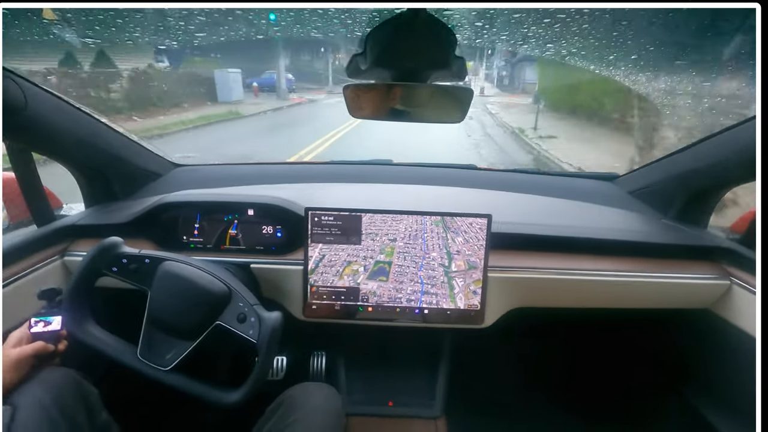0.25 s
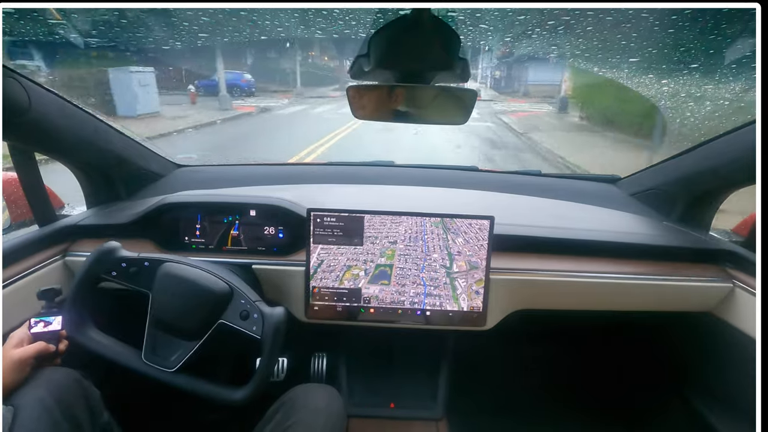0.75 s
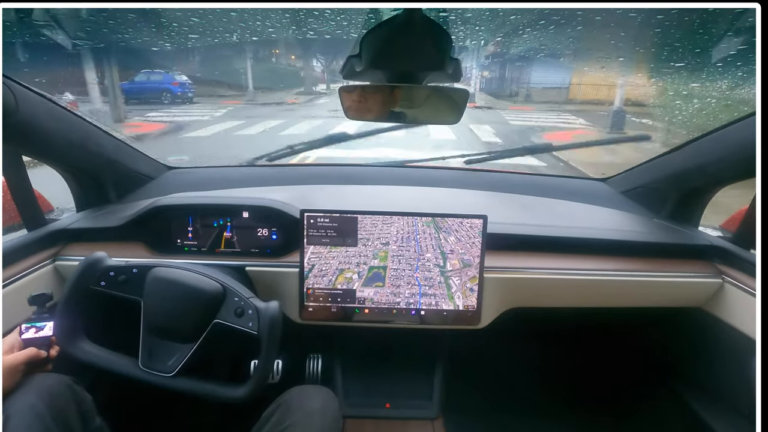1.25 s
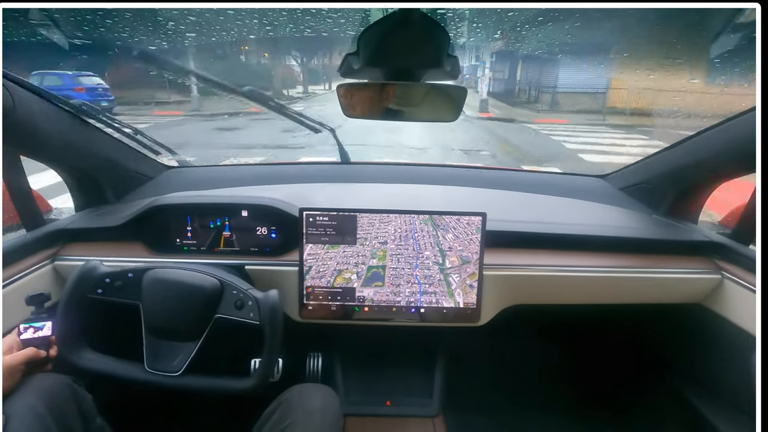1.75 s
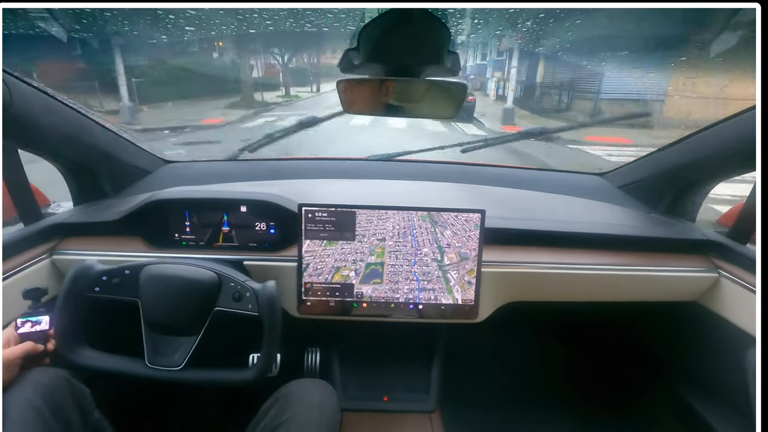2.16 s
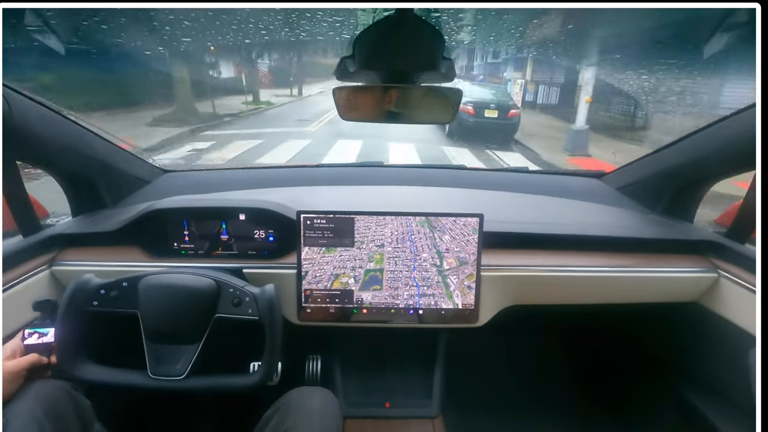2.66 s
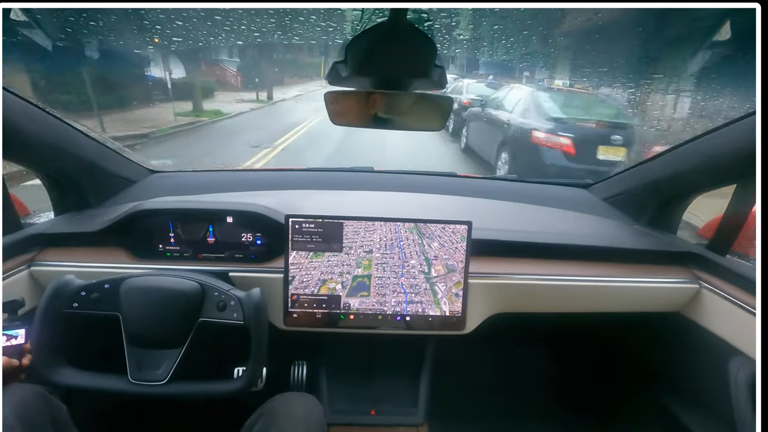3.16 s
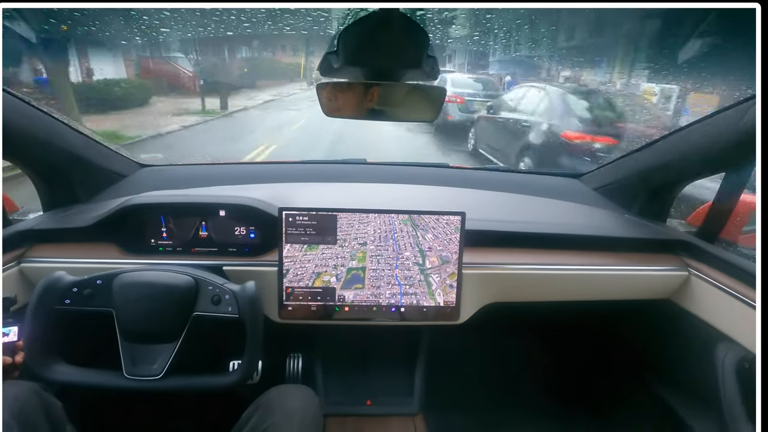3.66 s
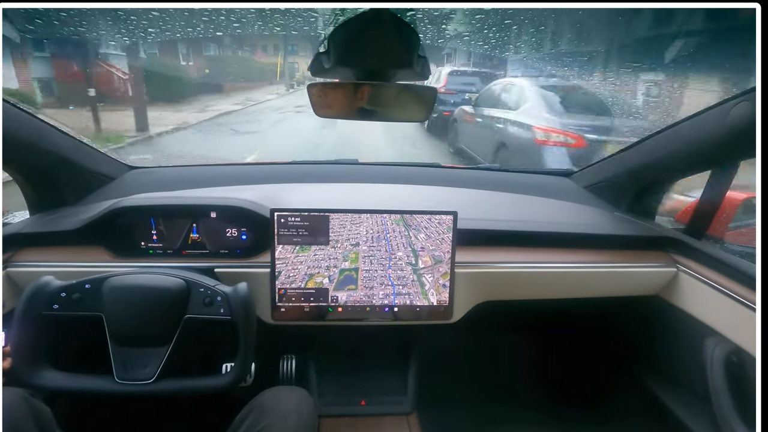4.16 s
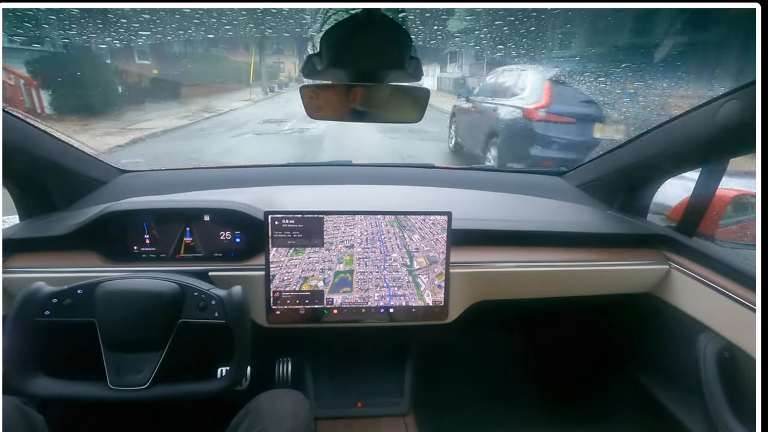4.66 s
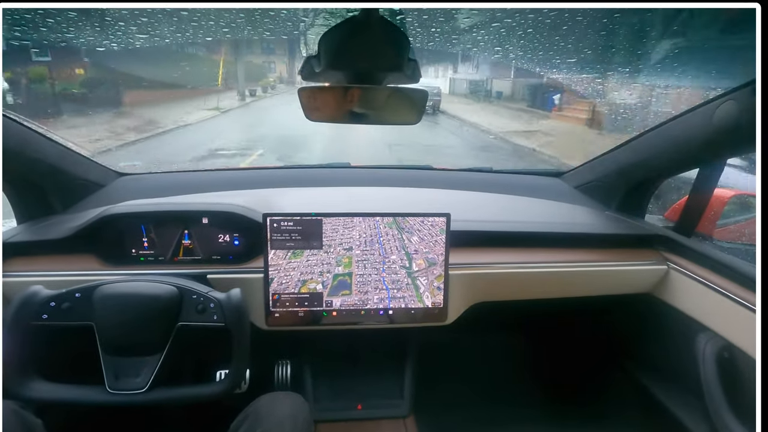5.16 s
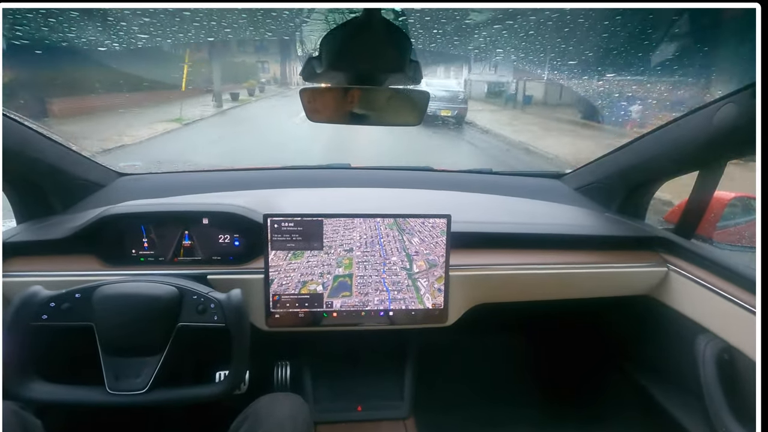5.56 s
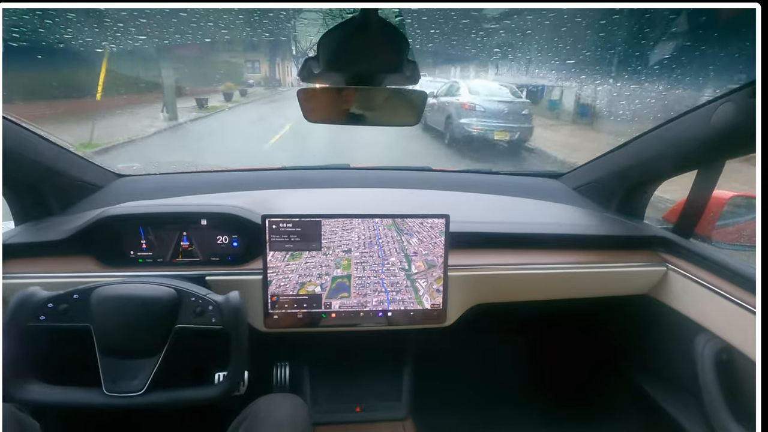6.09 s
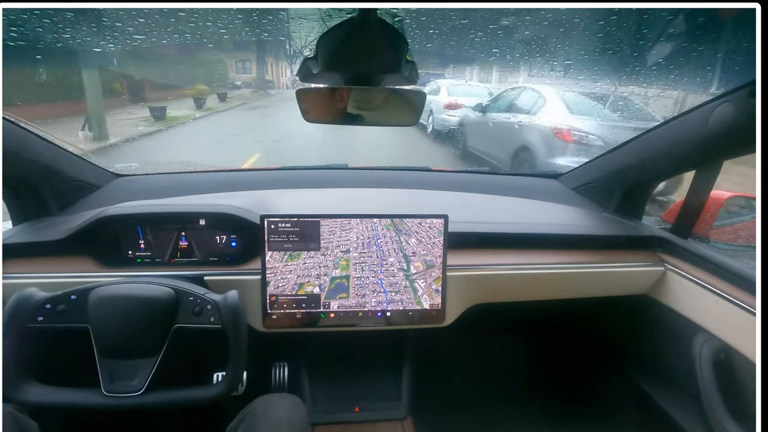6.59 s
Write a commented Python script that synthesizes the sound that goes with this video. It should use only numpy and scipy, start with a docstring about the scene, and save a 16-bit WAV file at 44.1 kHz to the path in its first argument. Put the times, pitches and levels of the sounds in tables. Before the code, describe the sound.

Heard from inside a car cabin driving through rain: low body rumble, tyre drone and soft wet hiss continue throughout. Fine drops patter densely while larger ones tick sharply on the glass. Bumps thump right at the start and in a heavier cluster around two and a half seconds, with trim knocking and a little splashing. Later bumps are softer, and the road noise dulls as the car slows.

```python
"""Wet street from inside a car

Shaped noise makes the rumble of the body, the tyre drone and roar, and the hiss and splashes of water.
Short bursts of noise make drops tick on glass and roof, and dying sine waves ring the glass as well.
Dying sine waves also make the thumps over bumps, dull knocks (most in the trim) and a small bright chink.
Rough sine tones squeak briefly; faint, wavering ones are the motor as the car speeds up and slows."""
import sys
import numpy as np
from scipy import signal
from scipy.fft import rfft, irfft, next_fast_len
from scipy.io import wavfile
from scipy.ndimage import uniform_filter1d

SR = 44100
rng = np.random.default_rng(int(sys.argv[2]) if len(sys.argv) > 2 else 0)


def master_out(mix):
    """Clip the mix to full scale and print it as 16-bit PCM to the path in sys.argv[1]."""
    frames = np.transpose(np.atleast_2d(mix))
    ceiling = np.clip(frames, -1, 1)
    pcm = np.round(ceiling * 32767).astype(np.int16)
    wavfile.write(sys.argv[1], SR, pcm)


N = 301203  # length of the scene in samples

# How hard the road drives the car. Each row: time in seconds, body boom in dB, tread roar in dB.
ROAD_LEVELS = [(0.0, -23.5, -30), (0.34, -29.5, -34.5), (0.84, -33.5, -35), (1.33, -27.5, -31.5),
               (2.33, -26, -34.5), (2.46, -18, -31), (2.6, -28, -31.5), (2.72, -22, -31), (2.83, -31, -37),
               (3.06, -31, -37.5), (3.69, -27, -33.5), (4.47, -28, -33.5), (4.87, -25.5, -31.5),
               (5.46, -20.5, -32), (6.13, -29, -36), (6.83, -32, -37.5)]
# Slow shake of the body. Each row: time in seconds, level in dB.
SHUDDER_LEVELS = [(0.0, -39), (1.08, -41), (2.68, -32), (3.12, -41.5), (4.6, -37.5), (6.01, -32),
                  (6.83, -49)]
# Noise colours of the slow shake, body boom, tyre-cavity drone and tread roar.
# Each row: frequency in Hz, relative strength in dB per Hz.
SHUDDER_COLOUR = [(12, -23.5), (25, 7.5), (42, 16.5), (60, -11), (80, -23.5)]
BOOM_COLOUR = [(45, -31), (62, -29.5), (76, -10.5), (100, -4.5), (125, -8.5), (160, -11), (220, -19.5)]
DRONE_COLOUR = [(130, -32.5), (190, -6.5), (235, -4), (290, -6), (380, -14.5), (460, -31), (620, -37)]
ROAR_COLOUR = [(300, -6.5), (420, 0.5), (480, -3), (520, 4), (570, -4.5), (700, -3.5), (850, -3.5),
               (1050, -14), (1400, -16.5), (2500, -22)]
# The drone lies between boom and roar: share of the boom's dB level, then an offset in dB.
DRONE_BOOM_SHARE, DRONE_OVER_DB = 0.15, 6
# As the car slows the road sound dulls: from this second on, by dB per octave above 450 Hz per second.
DULL_S, DULLING_DB = 5.5, 2.5

# Tones of the motor. Each row: ratio to the motor pitch, time when loudest in seconds, level then in dB,
# swell in dB per second, fade in dB per second.
MOTOR_TONES = [(1, 5.9, -37.5, 12, 10), (1.33, 5.0, -39.5, 16, 6), (1.345, 1.3, -41, 10, 25)]
# The motor pitch climbs until CRUISE_S, holds at CRUISE_HZ, and sinks from BRAKE_S on.
CRUISE_S, CLIMB_HZ_PER_S, CRUISE_HZ = 1.45, 190, 657
BRAKE_S, SINK_HZ_PER_S = 4.7, 112

# Spray and fine rain. Each row: time in seconds, base level in dB.
WET_LEVELS = [(0.0, -40.5), (0.17, -36.5), (0.4, -43), (1.54, -38), (2.6, -40.5), (3.21, -45.5),
              (3.56, -41), (5.8, -40), (6.41, -43.5), (6.83, -42.5)]
# Colour of the hiss, shared by the drops. Each row: frequency in Hz, relative strength in dB per Hz.
SPRAY_COLOUR = [(600, -37.5), (900, 1), (1100, -5), (1300, -7), (2200, -7), (3500, -6.5), (5000, -11.5),
                (6100, -18), (7300, -21.5), (8000, -30.5), (16000, -46)]
# Small drops a second; dB of their patter and of the hiss against the base level; patchiness of the hiss.
PATTER_PER_S, PATTER_DB, HISS_DB, HISS_PATCHY_DB = 600, 0, -5.5, 2.5
# Large drops. Each row: start in seconds, peak of the tick in dB, centre of its ring in Hz.
LARGE_DROPS = [(0.0527, -19, 2080), (0.196, -20, 1640), (0.212, -13.5, 1700), (0.644, -4, 2290),
               (0.717, -25, 1600), (0.7257, -14, 4300), (0.787, -21, 3500), (0.9304, -16, 2260),
               (0.955, -16.5, 1810), (1.078, -17.5, 3700), (1.3624, -16, 3070), (1.3998, -17.5, 3500),
               (1.528, -17.5, 3100), (1.5688, -20, 3800), (1.604, -14, 3000), (1.614, -14.5, 2320),
               (1.719, -25, 3300), (1.914, -20.5, 4500), (1.956, -19.5, 3080), (1.971, -24, 4500),
               (2.008, -21, 3500), (2.031, -23, 2800), (2.069, -19.5, 3000), (2.2939, -19, 2960),
               (2.3378, -16.5, 2230), (2.364, -18.5, 1590), (2.417, -20.5, 2050), (2.44, -17, 2000),
               (2.468, -18, 4530), (2.546, -20, 4230), (2.658, -18, 3000), (2.757, -18, 5000),
               (3.03, -29, 4000), (3.1, -25, 4200), (3.145, -27.5, 2000), (3.298, -25, 1900),
               (3.4221, -17.5, 3970), (3.673, -16.5, 1820), (3.731, -18, 4240), (4.0808, -17, 2610),
               (4.332, -20.5, 3150), (4.4106, -11.5, 2900), (4.491, -17.5, 3100), (4.5358, -16, 3720),
               (4.601, -28, 3000), (4.714, -26, 3520), (4.746, -19.5, 3120), (4.757, -16, 3600),
               (4.786, -18, 3940), (4.807, -15.5, 3020), (4.84, -16, 2740), (4.848, -16.5, 3220),
               (4.873, -12, 2880), (4.903, -17, 1600), (4.997, -21.5, 3020), (5.036, -23, 3000),
               (5.0814, -19, 2290), (5.211, -24, 3000), (5.38, -16.5, 1410), (5.522, -21.5, 3560),
               (5.563, -21, 3020), (5.698, -18, 2200), (5.7736, -21, 3200), (5.822, -31, 4000),
               (5.8556, -18, 3400), (5.876, -20.5, 4000), (5.917, -24, 3000), (6.0223, -22, 2500),
               (6.1434, -20.5, 2030), (6.217, -25, 3000), (6.369, -23.5, 3840), (6.418, -18, 3270),
               (6.478, -27, 3000), (6.509, -21.5, 4020), (6.541, -22.5, 3000), (6.619, -32, 3000),
               (6.646, -24.5, 2800), (6.662, -25, 2800), (6.681, -16, 2960), (6.7252, -17, 2810)]
# The higher a large drop rings, the brighter: tilt at 2500 Hz and its gain per octave (dB per octave).
BRIGHT_DB, BRIGHTER_DB = 1.6, 1.8
LEAD = 256  # samples of room ahead of each tick
# Modes of the glass. Each row: frequency in Hz, level in dB, time to fall by 60 dB in seconds.
PANE_MODES = [(1386, 3, 0.044), (1950, -3.5, 0.092), (2480, -5.5, 0.092), (2916, -10.5, 0.086),
              (3300, -13.5, 0.031), (4110, -2, 0.035)]
# Level of the glass against a drop's peak; loss per octave from the centre of the drop's ring.
PANE_DB, PANE_SPREAD_DB = -19, 3.5
PANE_SHIFT = 0.06  # spread of the mode pitches from spot to spot, as a share
# Splashes of thrown water. Each row: start in seconds, hold in seconds, level in dB.
SPLASH_TIMES = [(0.001, 0.049, -34), (.1, 0.12, -40), (0.271, 0.072, -38), (1.82, 0.31, -43.5),
                (2.414, 0.1, -35), (2.631, .13, -36), (4.8, 0.019, -48)]
# Colour of the splashes. Each row: frequency in Hz, relative strength in dB per Hz.
SPLASH_COLOUR = [(600, -32), (1000, 0.5), (2500, 0.5), (5000, -5), (7000, -12.5), (10000, -22.5),
                 (16000, -7)]
SPLASH_RISE_DB_PER_S, SPLASH_FALL_DB_PER_S = 903, 303
SPATTER_DB = 3.0  # quick unevenness of the thrown water

# Wheels over bumps. Each row: start in seconds, peak in dB, pitch where the body rings most in Hz.
BUMP_BLOWS = [(0.009, -11.5, 205), (0.046, -15.5, 143), (0.2284, -4, 105), (0.281, -9.5, 123),
              (2.047, -17, 225), (2.369, -10.5, 88.8), (2.4, -3.5, 163), (2.44, -4, 229), (2.49, -9.5, 187),
              (2.528, -17, 135), (2.662, -4, 135), (2.679, -13.5, 99.6), (2.719, -8, 149), (2.752, -9, 105),
              (3.547, -12.5, 117), (3.776, -16.5, 105), (4.427, -13, 91.5), (5.053, -15, 200),
              (5.399, -18, 112), (5.469, -13.5, 86.1)]
# Modes of the body. Each row: frequency in Hz, level in dB, time to fall by 60 dB in seconds.
BODY_MODES = [(110, 4.5, 0.097), (135, 1.5, 0.12), (162.6, 2, 0.1), (215.3, 1.5, 0.1), (306, -6.5, 0.019),
              (520, 10, 0.021)]

# Dull knocks: most in the trim, those at 0.644 and 6.418 the low thud of a large drop.
# Each row: start in seconds, peak in dB, pitch in Hz.
DULL_KNOCKS = [(0.277, -21, 666), (0.644, -28.5, 813), (2.396, -16.5, 552), (2.449, -19.5, 500),
               (2.494, -17.5, 482), (2.613, -19.5, 524), (2.664, -28, 670), (2.718, -18, 440),
               (2.427, -18, 480), (5.687, -19, 475), (5.998, -23, 635), (6.03, -23, 467),
               (6.073, -24.5, 513), (6.418, -28.5, 790)]
# Modes that every knock rings. Each row: ratio to its pitch, level in dB, time to fall by 60 dB in seconds.
KNOCK_MODES = [(1, 5.5, 0.048), (1.45, -3, 0.045), (2.097, -6.5, 0.035), (2.899, -10.5, 0.025)]
# Random knocks a second, and their lowest peak against the tread roar in dB.
RATTLE_PER_S, RATTLE_OVER_DB = 25, -0.5

# Brief squeaks. Each row: start in seconds, level in dB, pitch in Hz, length in seconds,
# pitch jitter as a share, glide in Hz per second, then the levels of harmonics 1 to 3 in dB.
SQUEAK_TONES = [(.954, -39.5, 2510, 0.017, 0.02, 0, -4, 3, -12),
                (.980, -27.5, 2575, 0.014, 0.03, -1200, -4, -0.5, -17),
                (1.603, -45, 2550, 0.014, .03, 0, 4, 10, -16),
                (1.994, -43, 3620, 0.05, 0.03, -2800, 5, -18, -9)]
# A small bright chink. Each row: frequency in Hz, level in dB, time to fall by 60 dB in seconds.
CHINK_MODES = [(6780, -32, .035), (7250, -38, .07), (7420, -39, .05), (7700, -33, .04), (7880, -29, .035)]
CHINK_S = 0.9555  # its start

# The top treble passes only faintly, in lobes. Each row: frequency in Hz, gain in dB.
TREBLE_GAIN = [(1, 3.5), (8000, -2.5), (8600, -7), (8850, -9.5), (9030, -36.5), (9300, -14), (10400, -8.5),
               (11000, -25.5), (12000, -12.5), (12900, -37.5), (16000, -34.5)]
EDGE_HZ = 15700  # upper limit of the whole sound


def amp(db):
    """Turns decibels into a gain."""
    return 10 ** (np.asarray(db) / 20)


def evened(x):
    """Scales a signal to an average strength (rms) of 1."""
    return x / np.sqrt(np.mean(x ** 2) + 1e-20)


def drift(size, count=N):
    """Smoothed random numbers with rms 1; a larger size drifts more slowly."""
    return evened(uniform_filter1d(rng.standard_normal(count), size=size))


def read(points, hz):
    """Reads a colour table in dB, evenly by octaves; outside the table it is nearly silent."""
    f, value = np.transpose(points)
    return np.interp(np.log(hz + 1), np.log(f + 1), value, -90, -90)


def curve(rows, axis, t):
    """Reads one column of a time table at the times t."""
    rows = np.array(rows)
    return np.interp(t, rows[:, 0], rows[:, axis])


def add(mix, s, sound):
    """Mixes a sound in at s seconds."""
    part = mix[max(round(s * SR), 0):][:len(sound)]
    part += sound[:len(part)]


def swell(t, start, hold, db, rise_db, fall_db):
    """A gain that climbs to db at start, holds and falls away, at slopes in dB per second."""
    before = np.maximum(start - t, 0)
    after = np.maximum(t - start - hold, 0)
    return amp(db - rise_db * before - fall_db * after)


def ringing(t, hz, db, t60):
    """One mode of a struck thing: a sine that dies by 60 dB in t60 seconds."""
    return amp(db - 60 * t / t60) * np.sin(2 * np.pi * hz * t)


def noise(points, size, patchy_db, dulling_db=0):
    """Noise built from random short-time spectra, with drifting patches of level."""
    hop = size // 4
    frames, hz = N // hop + 5, np.fft.rfftfreq(size, 1 / SR)
    a, b, patches = rng.standard_normal((frames, len(hz), 3)).T
    patches = uniform_filter1d(patches, size=6, axis=0)  # across frequency
    patches = evened(uniform_filter1d(patches, size=14, axis=1))  # across time
    field_db = read(points, hz)[:, None] + patchy_db * patches
    octaves_up = np.log2(np.maximum(hz / 450, 1))
    seconds_late = np.maximum(np.arange(frames) * hop / SR - DULL_S, 0)
    field_db -= dulling_db * np.outer(octaves_up, seconds_late)
    spectra = (a + 1j * b) * amp(field_db)
    return evened(signal.istft(spectra, nperseg=size, noverlap=size - hop)[1][:N])


def road():
    """Rough asphalt shakes the body, the air in the tyres and the tread."""
    t = np.arange(N) / SR
    boom_db, roar_db = curve(ROAD_LEVELS, axis=1, t=t), curve(ROAD_LEVELS, axis=2, t=t)
    drone_db = DRONE_BOOM_SHARE * boom_db + (1 - DRONE_BOOM_SHARE) * roar_db + DRONE_OVER_DB
    out = amp(curve(SHUDDER_LEVELS, axis=1, t=t)) * noise(SHUDDER_COLOUR, size=4096, patchy_db=-1.0)
    for level_db, colour in ((boom_db, BOOM_COLOUR), (drone_db, DRONE_COLOUR), (roar_db, ROAR_COLOUR)):
        out += amp(level_db) * noise(colour, size=2048, patchy_db=1.63, dulling_db=DULLING_DB)
    return out


def whine():
    """The motor's faint sine tones follow one wavering pitch and fade in and out."""
    t = np.arange(N) / SR
    climb = CLIMB_HZ_PER_S * np.maximum(CRUISE_S - t, 0)
    sink = SINK_HZ_PER_S * np.maximum(t - BRAKE_S, 0)
    turns = np.cumsum((CRUISE_HZ - climb - sink) * (1 + 0.007 * drift(4000))) / SR
    out = np.zeros(N)
    for ratio, s, db, rise, fall in MOTOR_TONES:
        level = swell(t, s, 0, db, rise, fall) * amp(3 * drift(4000))
        out += level * np.sin(2 * np.pi * ratio * turns)
    return out


def tick(hz, bright_db, t60, grain):
    """A sharp crack, then the dense dying ring of pane and cabin, lifted around hz; it starts LEAD samples in."""
    count = len(grain)
    t, f = np.arange(count) / SR, np.fft.rfftfreq(count, 1 / SR)
    burst = grain * (np.exp(-t / 0.002) + amp(-60 * t / t60)) * (1 - np.exp(-t / 0.0009))
    burst[20] += 14.0  # the blow itself
    burst[110] -= 9.0  # its first reflection
    lift_db = 3.7 * np.exp(-0.5 * (np.log2((f + 1) / hz) / 0.37) ** 2)
    colour_db = read(SPRAY_COLOUR, f) + lift_db + bright_db * np.log2((f + 1) / 3000)
    sound = irfft(rfft(np.roll(burst, LEAD)) * amp(colour_db), count)
    sound *= signal.windows.tukey(count, 0.05)  # soft ends
    return sound / abs(sound).max()


def pane(centre_hz, shift):
    """The glass rings briefly, most in the modes near centre_hz; the spot struck shifts them."""
    t = np.arange(3000) / SR
    return sum(ringing(t, shift * hz, db - PANE_SPREAD_DB * abs(np.log2(hz / centre_hz)), t60)
               for hz, db, t60 in PANE_MODES)


def large_drops():
    """Each large drop is a tick of noise together with a ring of the glass."""
    out = np.zeros(N + LEAD)
    for s, db, hz in LARGE_DROPS:
        bright_db = BRIGHT_DB + BRIGHTER_DB * np.log2(hz / 2500)
        add(out, s, amp(db) * tick(hz, bright_db, 0.08, rng.standard_normal(6000)))
        add(out[LEAD:], s, amp(db + PANE_DB) * pane(hz, 1 + PANE_SHIFT * rng.standard_normal()))
    return out[LEAD:]


def patter():
    """Small drops of random size fall at random moments, each sounding one of 24 different ticks."""
    size = amp(6.7 * np.minimum(rng.exponential(1, N), 3.0)) * (rng.random(N) < PATTER_PER_S / SR)
    size *= amp(1.1 * drift(1500))  # small drops come in flurries
    spot, out = rng.integers(0, 24, N), np.zeros(N)
    for k, (a, b, c) in enumerate(rng.random((24, 3))):
        tap = tick(1400 * 4.0 ** a, 2.0 * b - 0.8, 0.054 + 0.11 * c, rng.standard_normal(4000))
        out += signal.oaconvolve(size * (spot == k), tap)[:N]
    return evened(out)


def splashes():
    """Thrown water is noise that swells and falls quickly and spatters in level."""
    t = np.arange(N) / SR
    level = sum(swell(t, *row, SPLASH_RISE_DB_PER_S, SPLASH_FALL_DB_PER_S) for row in SPLASH_TIMES)
    return level * noise(SPLASH_COLOUR, size=256, patchy_db=3.0) * amp(SPATTER_DB * drift(350))


def rain():
    """Large drops stand out of the patter of small ones, the hiss of spray and the splashes."""
    hiss = noise(SPRAY_COLOUR, size=512, patchy_db=HISS_PATCHY_DB)
    fine = amp(PATTER_DB) * patter() + amp(HISS_DB) * hiss
    wet = amp(curve(WET_LEVELS, axis=1, t=np.arange(N) / SR))
    return large_drops() + wet * fine + splashes()


def bumps():
    """Each blow swells for a few milliseconds and rings the modes of the body."""
    out, t = np.zeros(N), np.arange(SR // 4) / SR
    spread_db = 13  # loss per octave away from the part that is struck
    for s, db, centre_hz in BUMP_BLOWS:
        ring = sum(ringing(t, hz, mode_db - spread_db * abs(np.log2(hz / centre_hz)), t60)
                   for hz, mode_db, t60 in BODY_MODES)
        ring *= 1 - np.exp(-t / 0.0033)
        add(out, s, -amp(db) * ring / abs(ring).max())
    return out


def knock(hz):
    """A dull knock: a quick rise into a few dying modes."""
    t = np.arange(4000) / SR
    ring = sum(ringing(t, ratio * hz, db, t60) for ratio, db, t60 in KNOCK_MODES)
    ring *= 1 - np.exp(-t / 0.001)
    return ring / abs(ring).max()


def knocks():
    """Set knocks of the trim and thuds of two large drops, then random trim knocks that follow the tread roar."""
    out = np.zeros(N)
    for s, db, hz in DULL_KNOCKS:
        add(out, s, amp(db) * knock(hz))
    level_db = curve(ROAD_LEVELS, axis=2, t=np.arange(N) / SR) + RATTLE_OVER_DB
    level_db += 2.8 * np.minimum(rng.exponential(1, N), 3)  # some are harder
    size = amp(level_db) * (rng.random(N) < RATTLE_PER_S / SR)
    spot = rng.integers(0, 8, N)  # eight pitches of knock
    for k in range(8):
        out += signal.oaconvolve(size * (spot == k), knock(340 * 1.09 ** k))[:N]
    return out


def squeaks():
    """Short stick-slip tones, rough in pitch, that throb; the first begins with a chink."""
    out = np.zeros(N)
    for s, db, hz, length, rough, glide, *partials_db in SQUEAK_TONES:
        t = np.arange(int(2.5 * length * SR)) / SR
        waver = drift(40, count=8000)[:len(t)]
        turns = np.cumsum((hz + glide * t) * (1 + rough * waver)) / SR
        tone = sum(amp(p) * np.sin(2 * np.pi * (k + 1) * turns) for k, p in enumerate(partials_db))
        throb = 1 + 0.65 * np.cos(2 * np.pi * 108 * (t - 0.002))  # 108 times a second
        shape = (1 - np.exp(-t / 0.0014)) * np.exp(-(t / length) ** 2) * throb
        add(out, s, amp(db) * tone * shape)
    t = np.arange(4000) / SR
    chink = sum(ringing(t, hz, db, t60) for hz, db, t60 in CHINK_MODES)
    add(out, CHINK_S, (1 - np.exp(-t / 0.00046)) * chink)
    return out


def scene():
    """Everything reaches one microphone in the cabin."""
    return (road() + whine() + rain() + bumps() + knocks() + squeaks())[None]


def record(dry):
    """Colours the treble, then cuts what lies above the upper limit."""
    size = next_fast_len(N + 4096)
    points = TREBLE_GAIN + [(SR, TREBLE_GAIN[-1][1])]  # the last gain holds to the top
    gain = amp(read(points, np.fft.rfftfreq(size, 1 / SR) + 1))
    coloured = irfft(rfft(dry, size) * gain, size)[:, :N]
    low_pass = signal.firwin(511, EDGE_HZ, window=("kaiser", 9), fs=SR)
    return signal.oaconvolve(coloured, low_pass[None], "same")


dry = scene()
out = record(dry)
master_out(out)
```